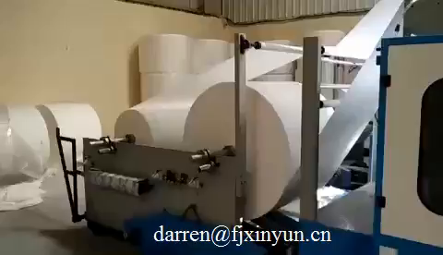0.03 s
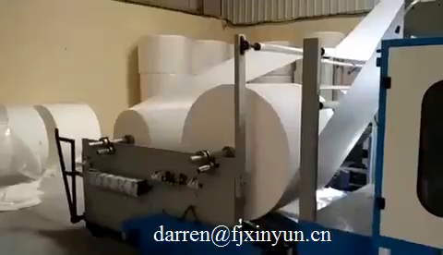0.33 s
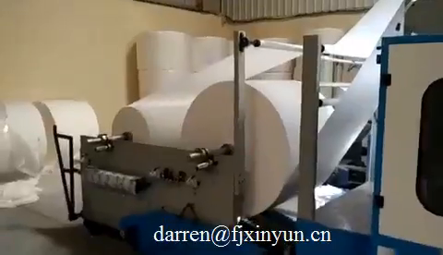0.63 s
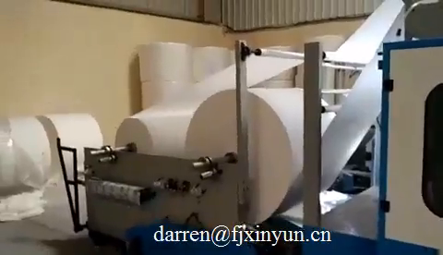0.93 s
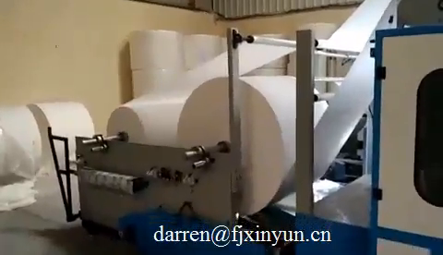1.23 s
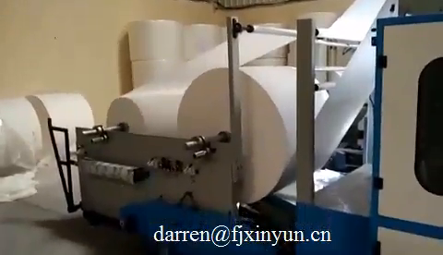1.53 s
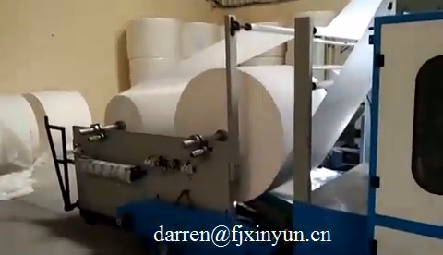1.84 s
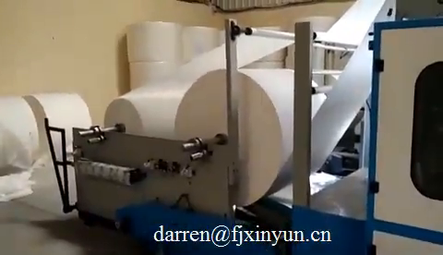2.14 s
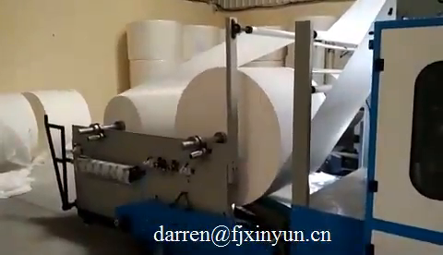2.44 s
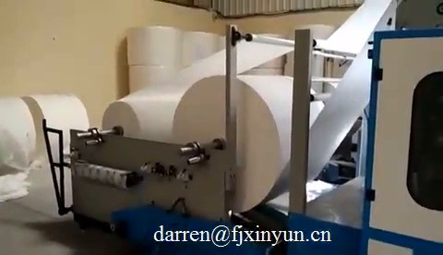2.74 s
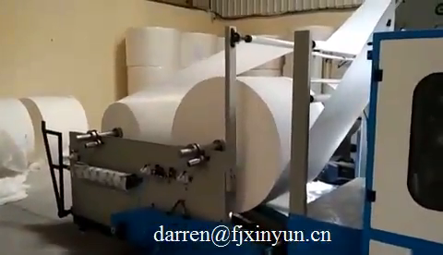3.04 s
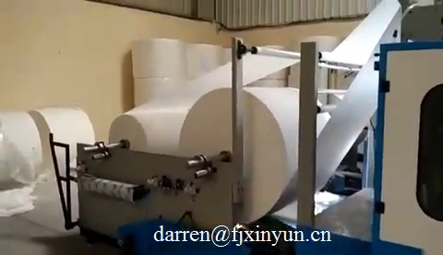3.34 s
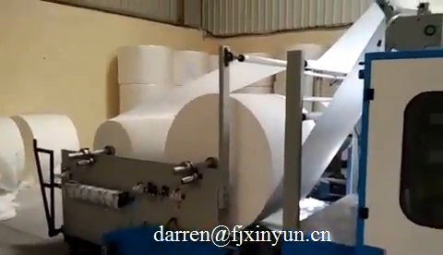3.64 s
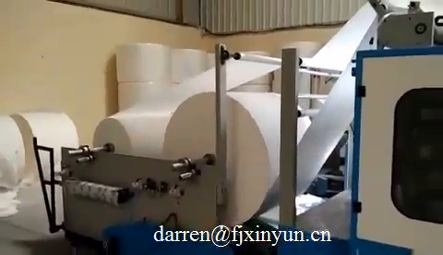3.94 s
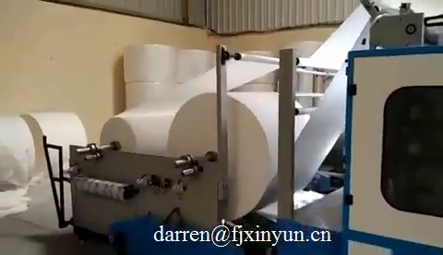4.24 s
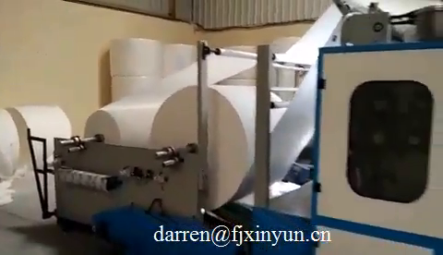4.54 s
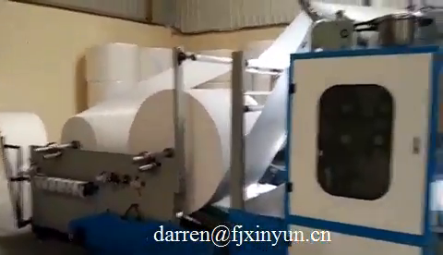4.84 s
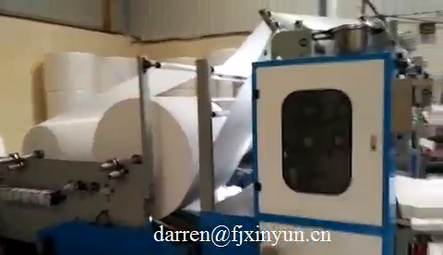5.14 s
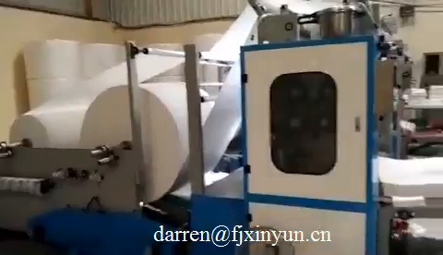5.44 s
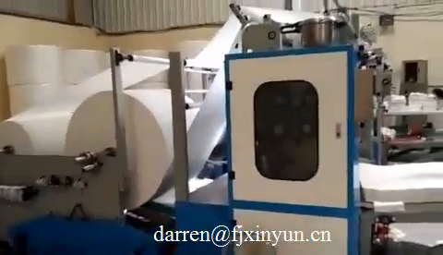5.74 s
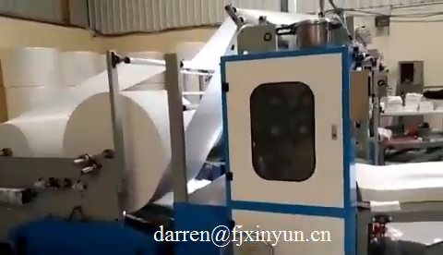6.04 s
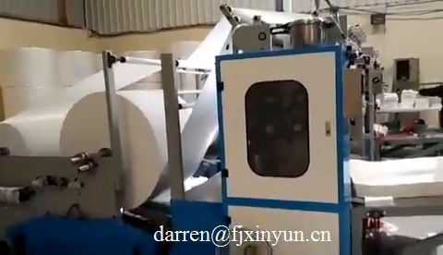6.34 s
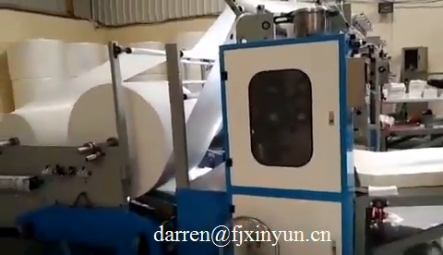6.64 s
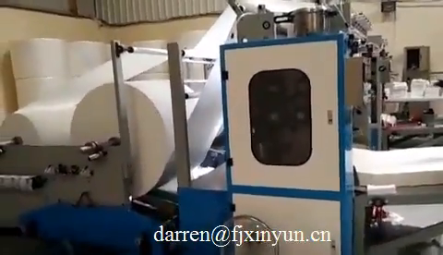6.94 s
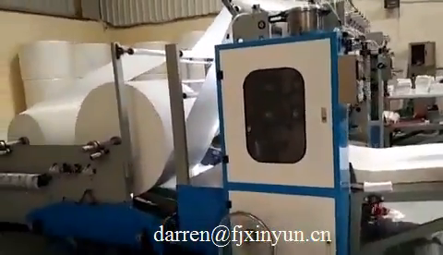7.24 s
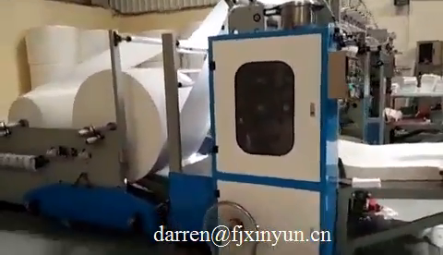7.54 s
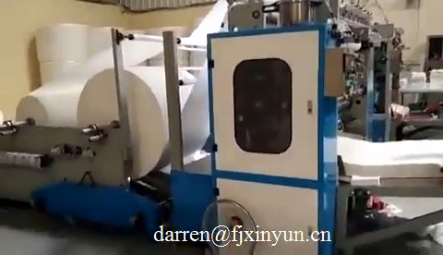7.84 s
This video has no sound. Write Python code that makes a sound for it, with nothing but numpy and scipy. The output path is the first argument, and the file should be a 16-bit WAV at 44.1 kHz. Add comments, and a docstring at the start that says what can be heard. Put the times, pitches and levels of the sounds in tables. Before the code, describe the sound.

A large paper processing machine fades in and runs loudly and steadily in a factory hall. Gears whine and throb, motors hum, and rollers rumble with a quick, even swish over the rush of moving paper. Brief squeaks, scuffs and a singing bearing recur. The tone shifts slightly midway and the hiss grows as the microphone turns toward the machine's cabinet. Two heavy knocks come near the end.

```python
"""A paper converting machine fades in, running steadily in a factory hall. Off-centre gears whine and
throb, motors hum, folding rolls rumble and swish seven times a second, and the paper web rushes by.
Almost at once the web squeaks; a dry bearing sings, the web scuffs a guide, and all three recur. At 4 s
a roller sings briefly, then a cabinet screens the drive. Hiss grows at the folding nip, the listener
turns from reel to cabinet at 5.1 s, and after 6 s the frame gives two heavy knocks."""
import sys
import numpy as np
from scipy import signal
from scipy.fft import rfft, irfft, next_fast_len
from scipy.io import wavfile
from scipy.ndimage import uniform_filter1d

SR = 44100
rng = np.random.default_rng(int(sys.argv[2]) if len(sys.argv) > 2 else 0)


def generate_wav(signal):
    """Clip the signal to [-1, 1] and save it as 16-bit WAV at the path in sys.argv[1]."""
    frames = np.transpose(np.atleast_2d(signal))
    scaled = np.clip(frames, -1, 1) * 32767
    pcm = np.round(scaled).astype(np.int16)
    wavfile.write(sys.argv[1], SR, pcm)


N = 352359
TIME = np.arange(N) / SR
MESH_HZ, GEAR_TURN_HZ, STROKE_HZ = 125.25, 3.465, 7.11

# Fade-in. Each row: time in seconds, gain in dB.
FADE_IN = [(.608, -97), (.613, -16), (.65, -11.5), (.72, -6.5), (.78, -4), (.83, -0.5)]
# Gear harmonics. Each row: multiple of the tooth rate, relative level in dB, share of the throb 0-1,
# roughness 0-1, change behind the cabinet in dB.
GEAR_HARMONICS = [(1, -25, 0.1, 0.6, 2), (2, -3.5, 0.06, 0.74, 0), (3, -14, 0.3, 0.98, -4),
                  (4, -4.5, 0.35, 0.92, 1), (5, -5.5, 0.4, 0.7, -7.5), (8, -7.5, 0.62, 0.9, 1),
                  (10, -14, 1, 0.8, -2), (11, -11, 0.85, 0.88, -5), (14, -18.5, 0.7, 0.96, 2)]
# Motor tones. Each row: frequency in Hz, level in the open in dB, level behind the cabinet in dB,
# roughness 0-1.
MOTOR_TONES = [(325.5, -24.5, -27.5, .3), (406, -34.5, -42, 0.76), (659.5, -40, -36.5, 0.63),
               (1154, -38, -45, .3), (3087, -38.5, -37, 0.47), (7051, -57, -57, .3)]
# Modes of the steel rollers and brackets. Each row: frequency in Hz, relative level in dB, time to fall
# 60 dB in seconds.
ROLLER_MODES = [(1575, 0, 0.18), (1680, -1, 0.22), (2134, 0, 0.16), (2240, 0, 0.28), (2690, -1.5, 0.16),
                (2790, -3.5, 0.12), (2885, 0.5, 0.12), (3296, -4, 0.11), (3620, -4, 0.13)]

# Noise spectra. Each row: frequency in Hz, relative spectral density in dB.
GUARD_SPECTRUM = [(900, -54), (1200, -10), (1370, -2), (1520, 5.5), (1660, 6.5), (1760, -16), (2200, -15),
                  (3500, -52)]  # sheet-metal gear guard
FRAME_SPECTRUM = [(30, -61), (70, -60), (125, -28), (160, -10.5), (200, -4), (255, 2), (340, 3), (450, -2),
                  (750, -1), (1050, -5.5), (1400, -2.5), (2000, -13), (4000, -54)]
FLOOR_SPECTRUM = [(30, -46), (70, -24), (100, -6.5), (125, 5.5), (160, -11), (250, -20.5)]
WEB_SPECTRUM = [(600, -60), (1200, -7), (1700, 0.5), (2200, 0.7), (2500, -1.5), (3300, -2.5), (3900, -4.5),
                (5300, -7), (7000, -14.5), (9300, -10), (11000, -63)]
SHEET_SPECTRUM = [(3000, -45), (5500, -7.5), (7000, -3.5), (8000, -3.5), (8900, -1), (9250, 2), (9900, 0),
                  (10400, -8.5), (11000, -33)]
NIP_SPECTRUM = [(1800, -40), (2500, -4), (3100, -1), (4200, -3.5), (5500, -11), (8000, -40)]

# Slow changes of level. Each row: time in seconds, gain in dB.
WHINE_GAIN = [(.85, -3.5), (1.5, 0), (4, 1), (6.4, 0), (7.9, 2)]
GUARD_GAIN = [(.9, -1), (1.25, -2), (1.5, 1), (2.05, .3), (2.35, -2), (2.95, -1.5), (3.25, 2), (3.55, 0),
              (3.8, 0.5), (4.15, -1), (4.4, -1), (5.5, -1.8), (7, -1.2), (7.25, -8), (7.6, -8), (7.85, -4)]
UPPER_TONE_GAIN = [(.85, 0), (1.22, 5), (1.5, 1.5), (1.65, -5), (1.87, 0.5), (2.05, -5), (2.32, 3),
                   (2.65, 0.5), (2.85, -3), (3.25, -2.5), (3.55, 4), (3.7, -3.5), (4, -1), (4.7, -2),
                   (4.95, 1.5), (5.25, -7), (5.42, 6), (5.7, -6), (5.87, 3.5), (6.1, -2), (6.9, 0.5),
                   (7.25, 1.5), (7.35, -9), (7.9, 1)]
LOWER_TONE_GAIN = [(1, -31.5), (3.8, -29.5), (4.1, -39), (4.45, -26.5), (5.15, -36), (5.6, -27.5), (6, -35),
                   (6.6, -33), (7, -41), (7.5, -22), (7.95, -34)]
WEB_GAIN = [(1, 0.8), (2.4, -0.5), (2.8, 1), (4.7, -0.6), (5.5, 0.35), (7, -0.5), (7.9, 1)]
BEARING_GAIN = [(1, 0), (2.5, 3), (5.5, -1), (7, -8)]
NIP_GAIN = [(4.7, -48), (5.3, -31.5), (5.9, -25), (7.4, -23.5), (7.9, -27.5)]

# Squeaks and scrapes of the web, and at 4 s a roller singing briefly near 3.3 kHz. Each row: start in
# seconds, first pitch in Hz, final pitch in Hz, fall time in seconds, decay time in seconds, tone level
# in dB, rasp level in dB.
SQUEAK_EVENTS = [(.774, 7600, 4960, 0.098, 0.18, -23, -25), (1.17, 5710, 4800, 0.064, 0.05, -23, -21),
                 (2.775, 3730, 3610, 0.072, 0.07, -25, -16), (4.02, 3320, 3280, .08, .2, -24, -34),
                 (5.581, 7580, 4910, 0.095, 0.095, -15, -20), (6.174, 6460, 3390, 0.036, .06, -23, -18)]
# Swells of the guard, about one a turn. Each row: middle in seconds, half length in seconds, level of
# the lower partial in dB, level of the upper partial in dB.
GUARD_SWELLS = [(.932, .1, -26, -27), (1.253, .06, -23, -25), (1.487, .09, -19.5, -24),
                (1.766, .085, -19.5, -29.5), (2.09, 0.086, -24.5, -25), (2.343, 0.098, -25, -26),
                (2.667, .1, -27, -21), (2.954, .08, -29.5, -21), (3.244, .065, -18.5, -23),
                (3.505, 0.096, -22, -21), (3.803, .08, -24, -20), (4.139, .11, -23.5, -26),
                (4.41, 0.048, -26, -24), (4.663, .1, -28, -23), (4.952, .08, -29.5, -25),
                (5.271, .1, -27, -26.5), (5.544, 0.098, -27, -23), (5.857, .1, -31.5, -22),
                (6.101, .08, -27, -22), (6.45, 0.1, -26, -25), (6.671, .065, -33, -20.5),
                (6.986, .075, -29, -22), (7.228, .06, -39, -27), (7.586, .11, -35, -28),
                (7.878, .055, -35, -20)]
# Scuffs on a guide. Each row: middle in seconds, half length in seconds, level in dB.
GUIDE_SCUFFS = [(1.183, .04, -25), (2.02, 0.078, -25), (2.21, 0.12, -24), (2.83, 0.11, -28),
                (3.242, 0.081, -21.5), (4.353, 0.084, -25), (7.12, 0.14, -22)]
# Hard knocks in the roller bearings. Each row: start in seconds, level in dB.
BEARING_KNOCKS = [(4.185, -22.5), (4.868, -23.5), (5.245, -24)]
# Knocks of the frame. Each row: start in seconds, level in dB, centre in Hz, decay time in seconds.
FRAME_KNOCKS = [(6.35, -13.5, 800, 0.037), (6.68, -16.5, 259.5, 0.1)]
# Width of the hall's sound. Each row: frequency in Hz, side relative to mid in dB facing the reel, the
# same facing the cabinet.
HALL_WIDTH = [(60, -19, -10), (190, -27, -22), (600, -26, -22.5), (1900, -24, -21), (3400, -20, -16),
              (5800, -5.5, -6.5), (10600, -3.5, -3.5)]


def undb(db):
    """Amplitude ratio of a level in decibels."""
    return 10 ** (np.asarray(db) / 20)


def unit(x):
    """Normalisation to an rms of 1."""
    return x / np.sqrt(np.mean(np.abs(x) ** 2))


def curve(rows):
    """Linear interpolation of (seconds, value) points."""
    return np.interp(TIME, *np.transpose(rows))


def colour(x, points):
    """Spectral shaping by (Hz, dB) points on a logarithmic frequency axis."""
    hz, db = np.transpose(points)
    size = next_fast_len(N)
    bins = np.maximum(np.fft.rfftfreq(size, 1 / SR), 1)
    gain = undb(np.interp(np.log(bins), np.log(hz), db))
    return irfft(rfft(x, size) * gain, size)[:N]


def walk(rate):
    """Smoothed noise of rms 1 that changes about rate times a second."""
    k = int(SR / rate)
    held = np.repeat(rng.standard_normal(N // k + 2), k)
    return unit(uniform_filter1d(uniform_filter1d(held, k), k)[:N])


def waver(rough, rate):
    """Random amplitude and phase modulation: a complex gain, part steady and part wandering."""
    return np.sqrt(1 - rough ** 2) + rough * unit(walk(rate) + 1j * walk(rate))


def drift(rough, rate):
    """Random phase modulation: a complex gain of nearly constant magnitude."""
    gain = waver(rough, rate)
    return unit(gain / np.sqrt(np.abs(gain) ** 2 + .1))


def tone(hz, gain):
    """A sinusoidal carrier modulated by a complex gain, at rms 1."""
    return unit(np.real(gain * np.exp(2j * np.pi * hz * TIME)))


def crinkle(per_s, spread_db):
    """A Poisson train of clicks, a few much larger than the rest."""
    chance, size, sign = rng.random(N), rng.exponential(size=N), rng.standard_normal(N)
    return unit((chance < per_s / SR) * undb(spread_db * np.minimum(size, 5)) * np.sign(sign))


def once_a_turn(turn_hz, at, width):
    """A periodic Gaussian pulse; its position and width are fractions of a turn."""
    offset = (turn_hz * TIME - at + .5) % 1 - .5
    return np.exp(-(offset / width) ** 2)


def gears(shaded, tight_at=0.2, wobble=0.0047, scrape_db=-8):
    """Eccentricity modulates the mesh: teeth bind for half of each turn, so pitch and level swing."""
    whine_db = -27 + curve(WHINE_GAIN)
    guard_db = -19.5 + curve(GUARD_GAIN)
    turn = 2 * np.pi * (GEAR_TURN_HZ * TIME - tight_at)
    throb_db = 6.5 * np.tanh(1.5 * np.cos(turn))
    tooth_hz = MESH_HZ * (1 + wobble * np.sin(turn) + 0.00202 * walk(12))
    tooth_phase = 2 * np.pi * np.cumsum(tooth_hz) / SR
    scrape = unit(colour(rng.standard_normal(N), GUARD_SPECTRUM) * undb(throb_db))
    out = scrape * undb(guard_db + scrape_db)
    for multiple, db, share, rough, shade_db in GEAR_HARMONICS:
        phase = multiple * tooth_phase + 2 * np.pi * rng.random()
        partial = np.real(drift(rough, rate=30) * np.exp(1j * phase))
        # upper partials radiate from the guard, lower ones from the frame
        path_db = guard_db if multiple > 9 else whine_db
        out += unit(partial * undb(share * throb_db)) * undb(db + shade_db * shaded + path_db)
    return out + guard_resonance(tooth_phase)


def drive_tones(upper_hz=876, lower_hz=749, beat_hz=12.41):
    """Amplitude modulation: two tones of the drive swell and sink, and the upper one beats quickly."""
    beating = 1 + 0.4 * np.cos(2 * np.pi * beat_hz * TIME)
    upper = tone(upper_hz, drift(rough=0.98, rate=46) * beating)
    lower = tone(lower_hz, waver(rough=0.56, rate=46))
    return upper * undb(-25 + curve(UPPER_TONE_GAIN)) + lower * undb(curve(LOWER_TONE_GAIN))


def motors(shaded):
    """Propagation through the hall makes the tones waver; the cabinet shades some, uncovers others."""
    out = np.zeros(N)
    for hz, open_db, shaded_db, rough in MOTOR_TONES:
        out += tone(hz, waver(rough, rate=9)) * undb(open_db + (shaded_db - open_db) * shaded)
    return out


def folding_rolls(shaded, turned, heavy_at=0.96):
    """Forced vibration: the same clatter on each stroke, over loose knocking, shakes frame and floor."""
    clatter = np.resize(rng.standard_normal(round(SR / STROKE_HZ)), N)
    knocks = crinkle(per_s=2500, spread_db=2.5)
    load_db = 0.5 * np.cos(2 * np.pi * (STROKE_HZ * TIME - heavy_at)) + .5 * walk(12)
    shake = (undb(-4) * clatter + knocks) * undb(load_db)
    frame = unit(colour(shake, FRAME_SPECTRUM)) * undb(-17 - 0.5 * turned)
    floor = unit(colour(shake, FLOOR_SPECTRUM)) * undb(-40.5 - 7 * shaded + 2 * walk(9.2))
    return frame + floor


def rollers(chatter_db=-28.5):
    """Impacts in loose bearings excite the rollers' damped modes: random chatter and a few hard blows."""
    t = TIME[:SR // 2]
    hard = np.zeros(N)
    for start, db in BEARING_KNOCKS:
        hard[int(start * SR)] = undb(db)
    chatter, blows = np.zeros(N), np.zeros(N)
    for hz, db, t60 in ROLLER_MODES:
        ring = np.sin(2 * np.pi * hz * t) * undb(-60 * t / t60)
        light = crinkle(per_s=160, spread_db=1.8)
        chatter += undb(db) * unit(signal.oaconvolve(light, ring)[:N])
        blows += undb(db) * signal.oaconvolve(hard, ring * rng.choice([-1, 1]))[:N]
    return undb(chatter_db) * unit(chatter) + blows


def web():
    """Friction noise: the running paper rubs and crackles, and flutters as its tension changes."""
    rub = rng.standard_normal(N) + undb(-3.5) * crinkle(per_s=2200, spread_db=0.5)
    slack_db = .35 * walk(10)
    tug_db = 0.68 * once_a_turn(turn_hz=2.88, at=0.0081, width=0.14)  # an out-of-round guide roller
    rush = unit(colour(rub * undb(0.85 * walk(35)), WEB_SPECTRUM))
    return rush * undb(-18.5 + curve(WEB_GAIN) + slack_db + tug_db)


def sheets(turned, enters_at=0.4, rise=0.04, fall=0.19):
    """Periodic friction noise: each sheet swishes into the rolls and dies down before the next."""
    age = (STROKE_HZ * TIME - enters_at) % 1  # in strokes
    push = 1 + (1 - np.exp(-(age / rise) ** 2)) * np.exp(-age / fall)
    rub = rng.standard_normal(N) + undb(-8.5) * crinkle(per_s=2400, spread_db=4)
    flutter = undb(1.6 * walk(60))
    swish = unit(colour(rub * push * flutter, SHEET_SPECTRUM))
    return swish * undb(-27 + 2 * turned + walk(7))


def hall(x, t60):
    """Reverberation: diffuse echoes from walls and roof decay exponentially, with unit power gain."""
    echoes = rng.standard_normal(SR) * undb(-60 * TIME[:SR] / t60)
    return signal.fftconvolve(x, echoes / np.linalg.norm(echoes))[:N]


def squeaks(attack_s=0.005, lower_ratio=.82, lower_db=-6.5):
    """Damped vibration: the web squeaks and scrapes with falling pitch, and once a roller sings."""
    out = np.zeros(N)
    sing = drift(rough=.95, rate=420)
    rasp = waver(rough=1, rate=2200)
    for start, first_hz, final_hz, fall_s, decay_s, tone_db, rasp_db in SQUEAK_EVENTS:
        age = np.maximum(TIME - start, 0)
        hz = final_hz + (first_hz - final_hz) * np.exp(-age / fall_s)
        phase = 2 * np.pi * np.cumsum(hz) / SR
        fading = np.exp(-age / decay_s)
        squeak = (undb(tone_db) * sing + undb(rasp_db) * rasp * fading) * np.exp(1j * phase)
        # a second tone sings lower and stops sooner
        lower = undb(tone_db + lower_db) * sing * fading * np.exp(1j * lower_ratio * phase)
        out += np.sqrt(2) * np.real(squeak + lower) * fading * (1 - np.exp(-age / attack_s))
    return out


def guard_resonance(tooth_phase, multiples=(12, 13)):
    """Resonance: as the wheel binds, two tooth harmonics swell in the guard, in a shifting balance."""
    out = np.zeros(N)
    for k, multiple in enumerate(multiples):
        swell = sum(undb(levels[k]) * np.exp(-((TIME - middle) / half_s) ** 4)
                    for middle, half_s, *levels in GUARD_SWELLS)
        partial = np.real(drift(rough=.5, rate=28) * np.exp(1j * multiple * tooth_phase))
        out += swell * unit(partial)
    return out


def dry_bearing(hz=1565):
    """Friction-excited vibration: a dry bearing on a slow roller sings briefly once a turn."""
    song = tone(hz, drift(rough=0.75, rate=35))
    swell = once_a_turn(turn_hz=.675, at=0.7, width=0.049)
    return song * swell * undb(-25 + curve(BEARING_GAIN))


def scuffs(edge_hz=8000, edge_db=-11):
    """Sliding friction: the web drags on a guide, its hiss swells and the paper's edge sings thinly."""
    swell = sum(undb(db) * np.exp(-((TIME - middle) / half_s) ** 2)
                for middle, half_s, db in GUIDE_SCUFFS)
    edge = tone(edge_hz, waver(rough=1, rate=700))
    hiss = unit(colour(rng.standard_normal(N) * undb(walk(45)), SHEET_SPECTRUM))
    return (hiss + undb(edge_db) * edge) * swell


def nip():
    """Friction noise of paper in the folding nip, faint until the listener comes to face that end."""
    rub = rng.standard_normal(N) * undb(0.99 * walk(35))
    return unit(colour(rub, NIP_SPECTRUM)) * undb(curve(NIP_GAIN))


def clanks(attack_s=0.006):
    """Impact excitation: each heavy knock stirs one band of the frame's range, which then decays."""
    out = np.zeros(N)
    for start, db, hz, decay_s in FRAME_KNOCKS:
        age = np.maximum(TIME - start, 0)
        envelope = (1 - np.exp(-age / attack_s)) * np.exp(-age / decay_s)
        band = [(hz / 4, -70), (hz / 2, -28), (hz, 0), (hz * 2, -14), (hz * 8, -70)]
        out += unit(colour(rng.standard_normal(N), band)) * undb(db) * envelope
    return out


def scene():
    """Superposition: the sources add in the middle; reflections spread their treble to both sides."""
    shaded = curve([(4.4, 0), (4.5, 1)])  # the cabinet comes in front of the drive
    turned = curve([(5.1, 0), (5.14, 1)])  # the listener turns from reel to cabinet
    squeaking = squeaks()
    drive = gears(shaded) + drive_tones() + dry_bearing() + motors(shaded)
    rattle = folding_rolls(shaded, turned) + rollers() + clanks()
    paper = web() + nip() + sheets(turned) + scuffs()
    mid = drive + rattle + paper + squeaking + undb(-5) * hall(squeaking, t60=0.85)
    echoes = hall(mid, t60=.24)
    at_reel = colour(echoes, [(hz, db) for hz, db, _ in HALL_WIDTH])
    at_cabinet = colour(echoes, [(hz, db) for hz, _, db in HALL_WIDTH])
    side = (1 - turned) * at_reel + turned * at_cabinet
    return np.array([mid + side, mid - side])


def record(dry, ceiling=.86, low_cut_hz=41, top_hz=10900):
    """After the fade-in, soft saturation rounds the peaks and filters limit the bandwidth."""
    faded = dry * undb(curve(FADE_IN)) * (TIME >= FADE_IN[0][0])
    rounded = faded / (1 + (faded / ceiling) ** 8) ** (1 / 8)
    thinned = signal.sosfilt(signal.butter(1, low_cut_hz, "high", fs=SR, output="sos"), rounded)
    return signal.sosfilt(signal.ellip(10, .2, 80, top_hz, fs=SR, output="sos"), thinned)


dry = scene()
out = record(dry)
generate_wav(out)
```